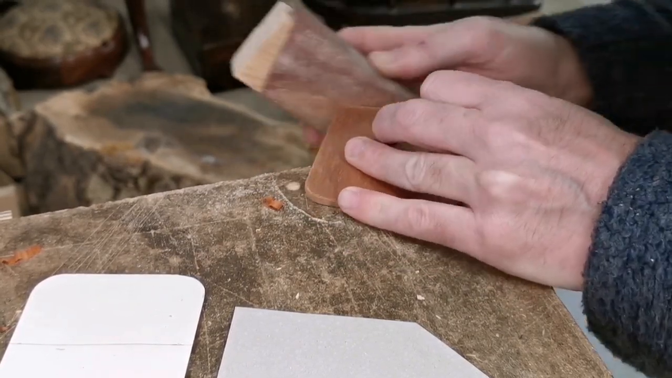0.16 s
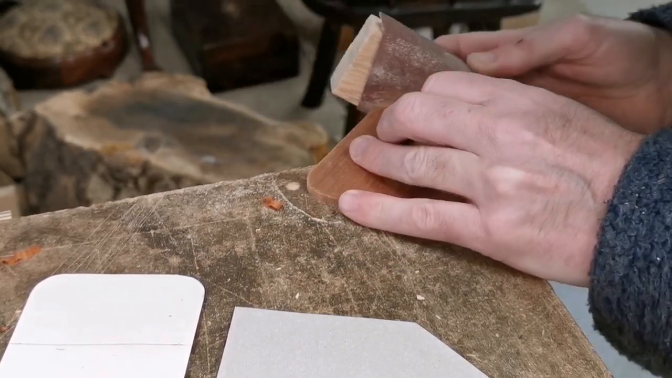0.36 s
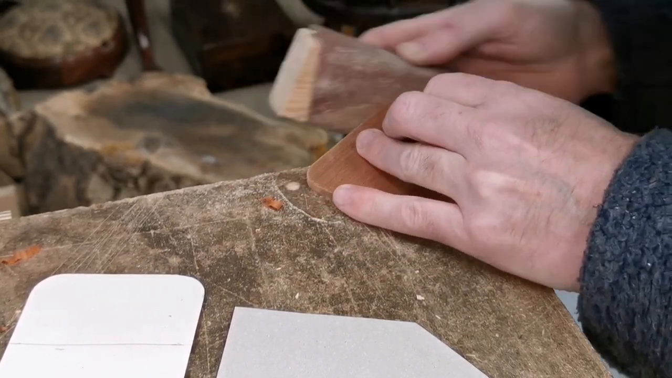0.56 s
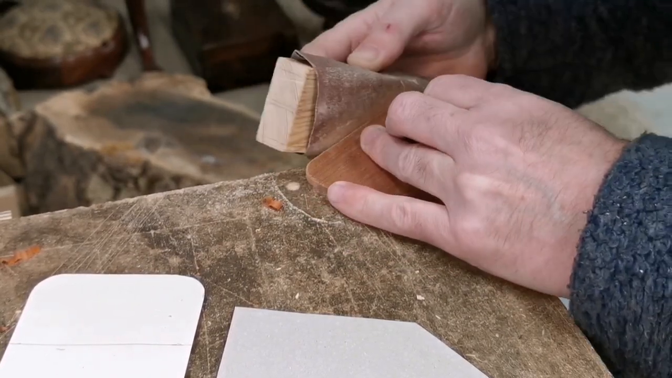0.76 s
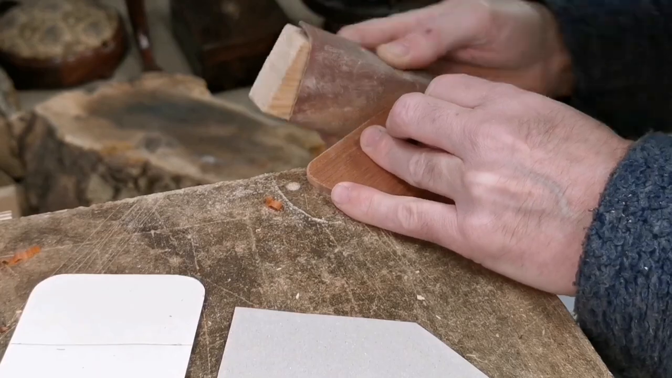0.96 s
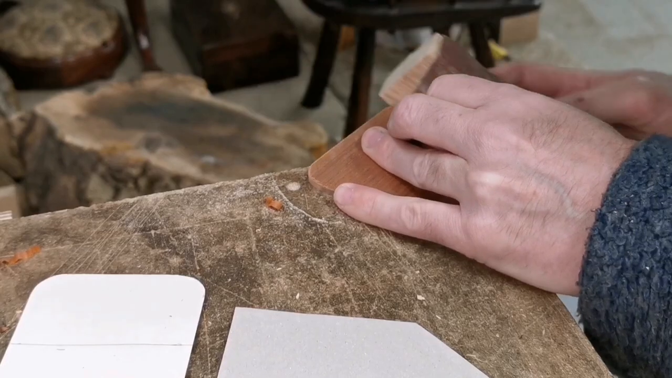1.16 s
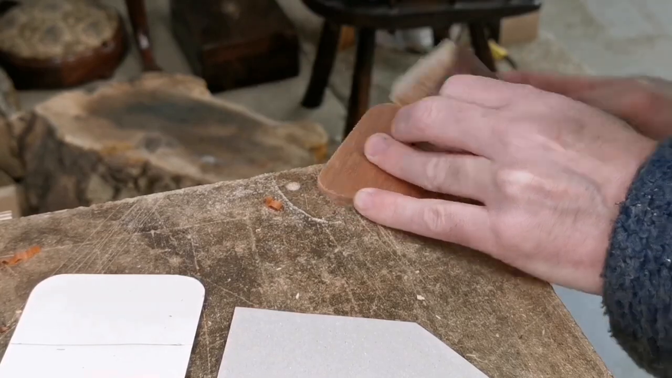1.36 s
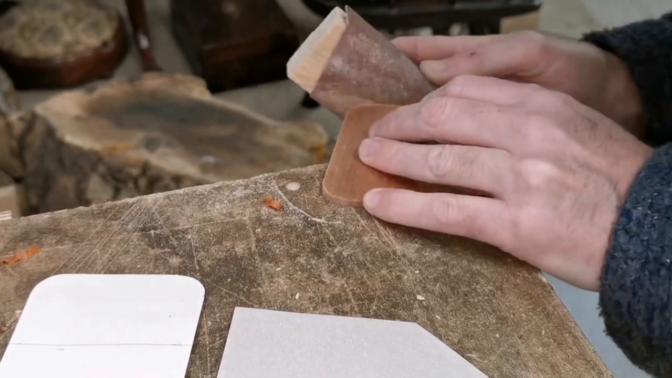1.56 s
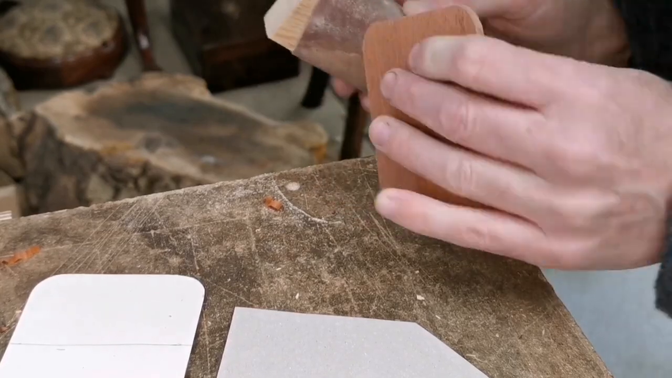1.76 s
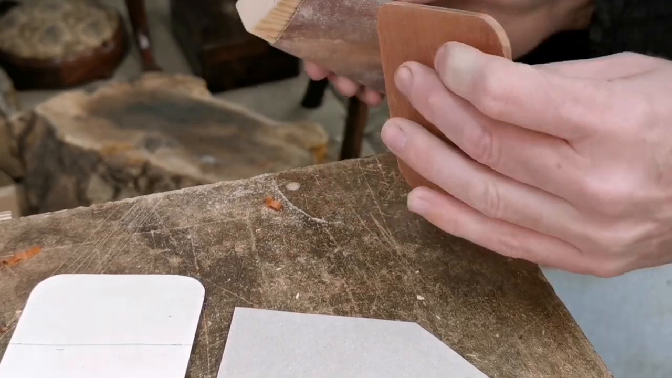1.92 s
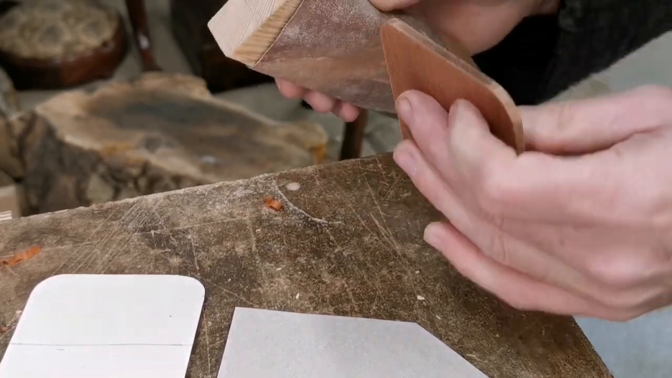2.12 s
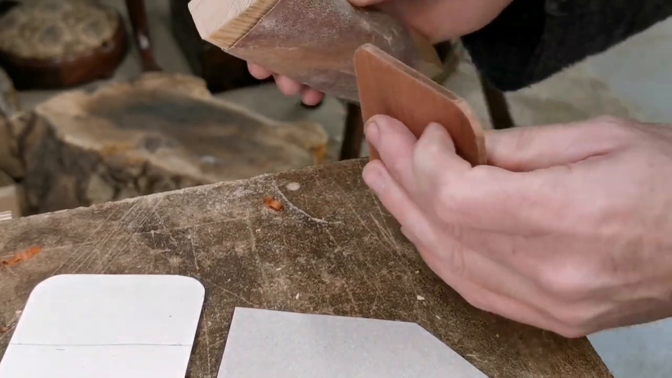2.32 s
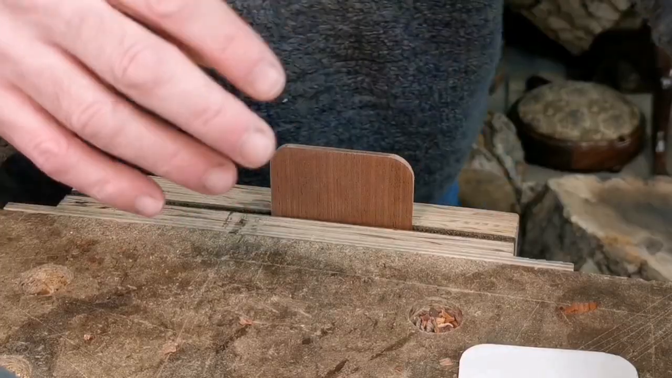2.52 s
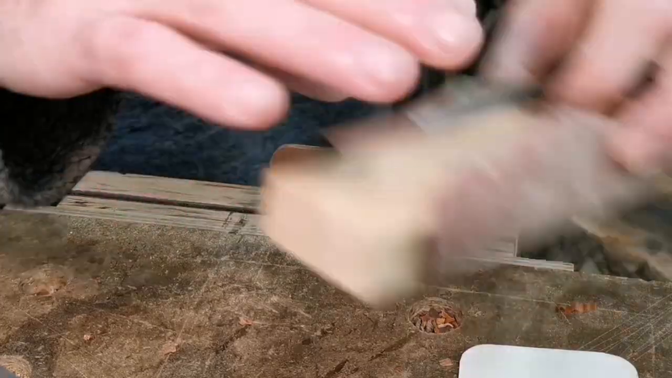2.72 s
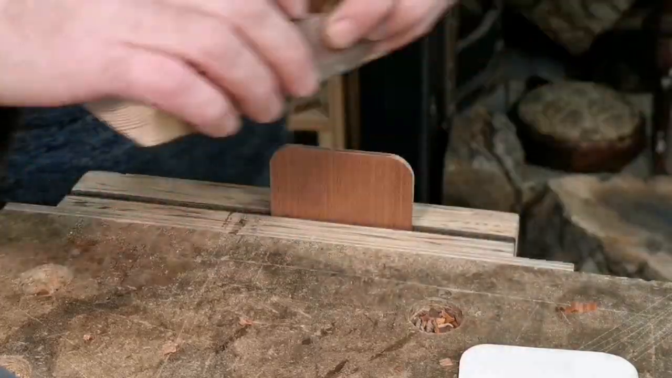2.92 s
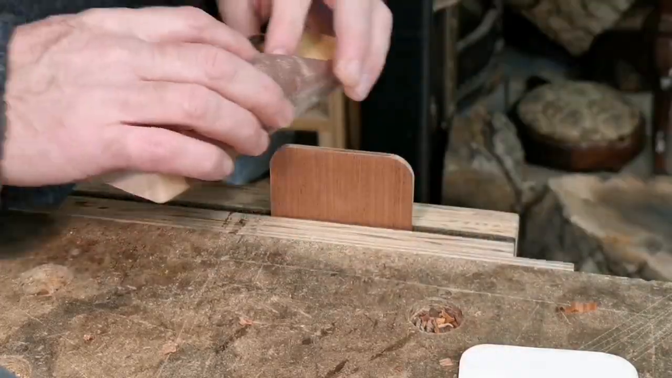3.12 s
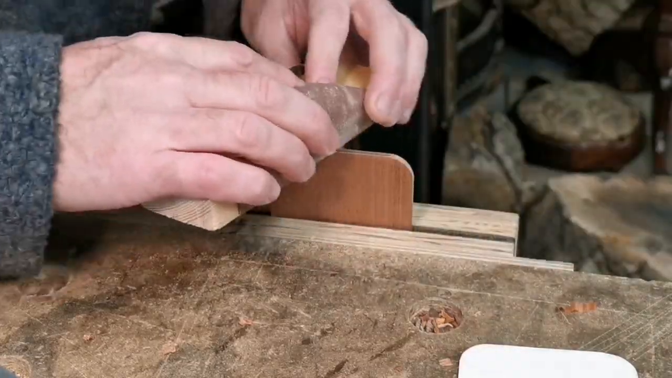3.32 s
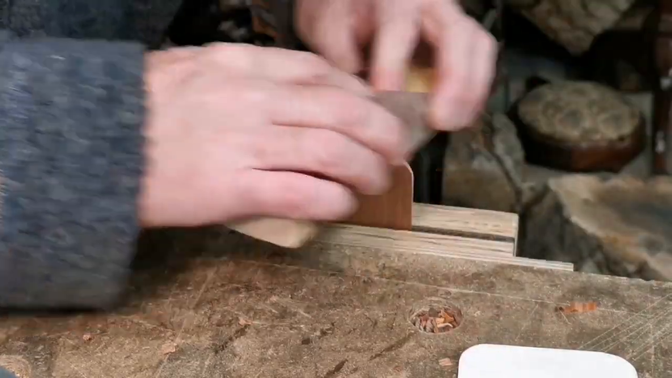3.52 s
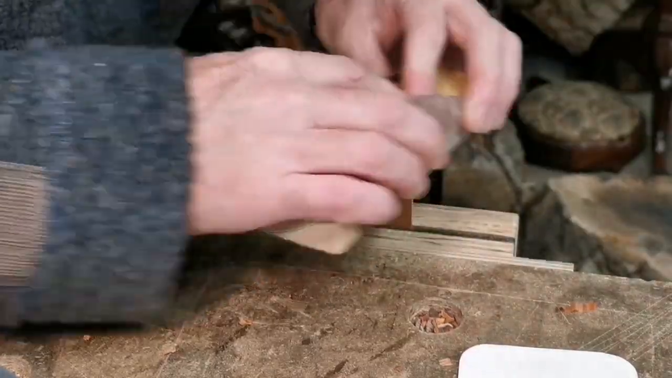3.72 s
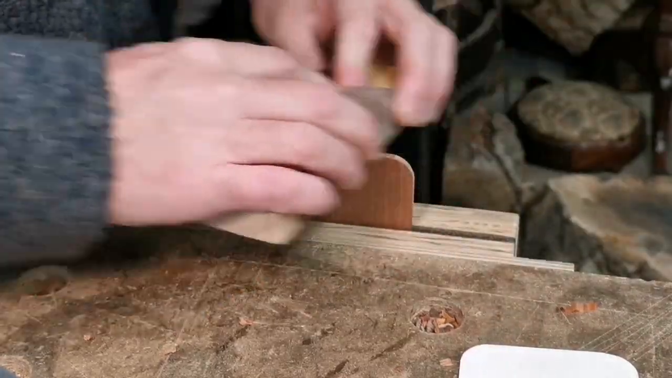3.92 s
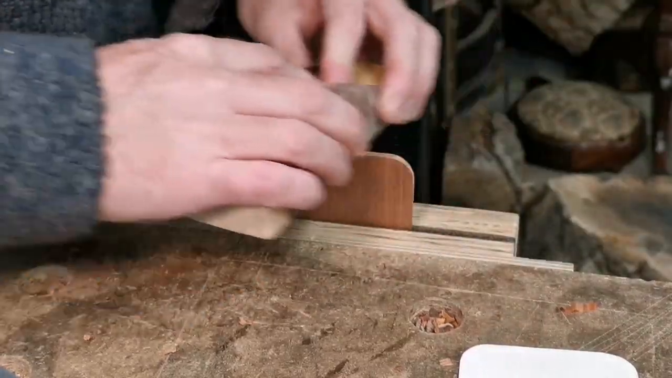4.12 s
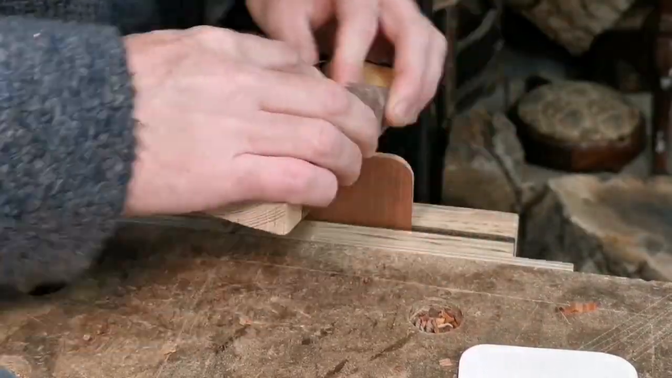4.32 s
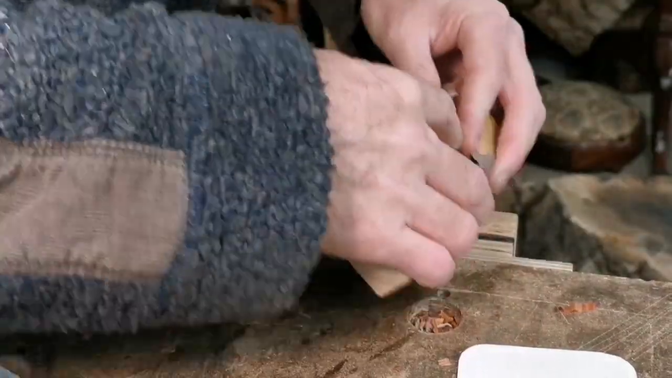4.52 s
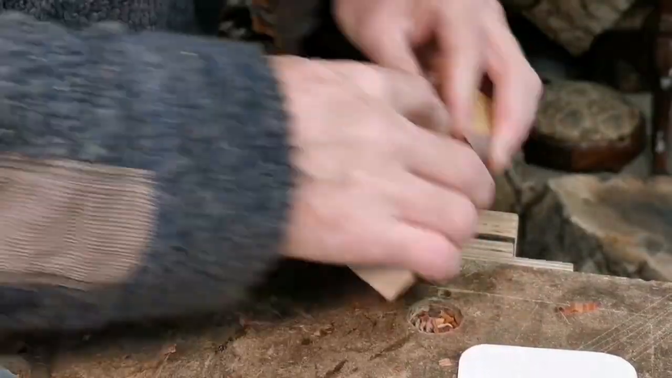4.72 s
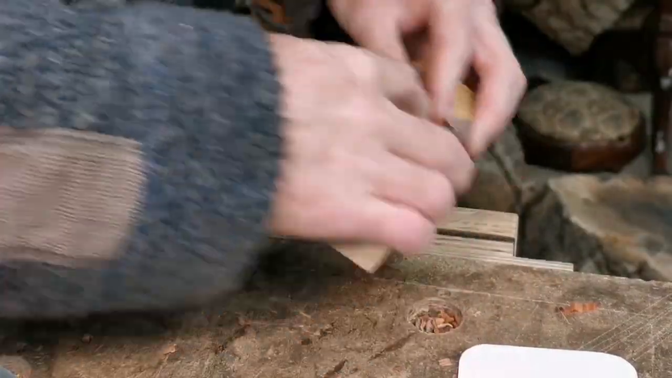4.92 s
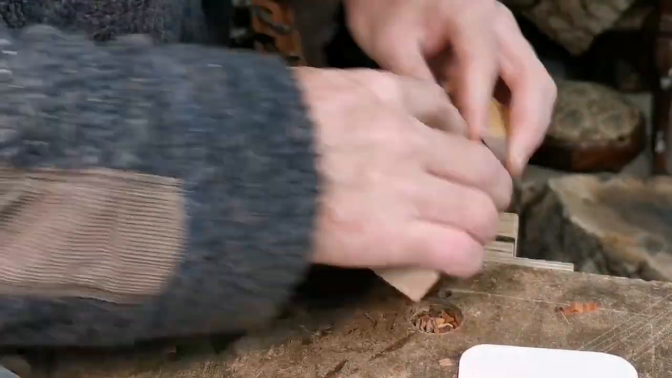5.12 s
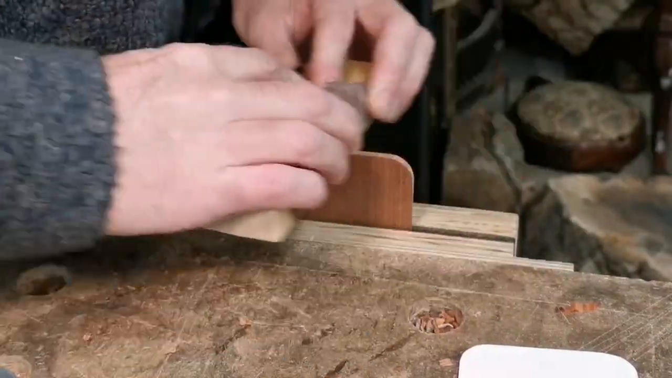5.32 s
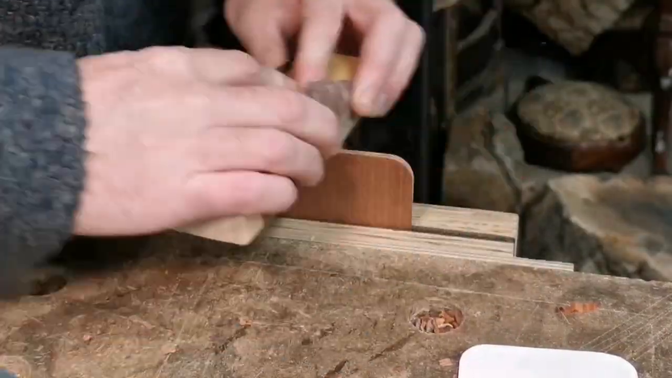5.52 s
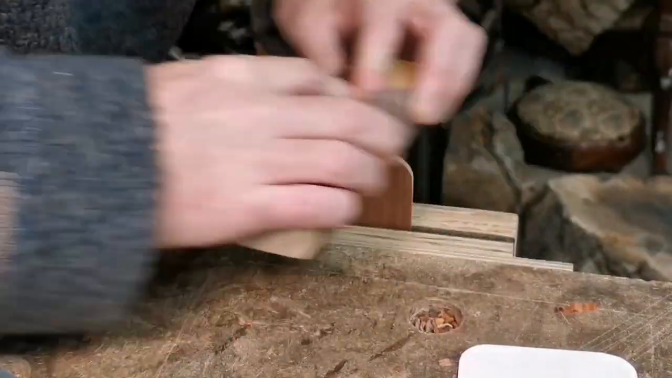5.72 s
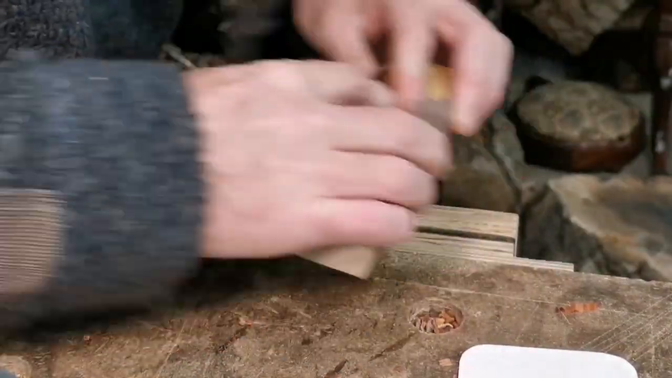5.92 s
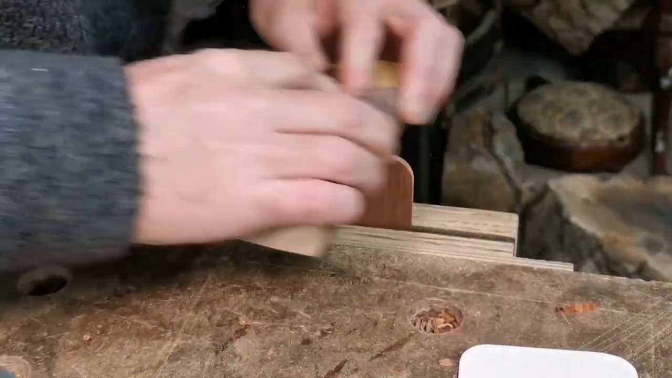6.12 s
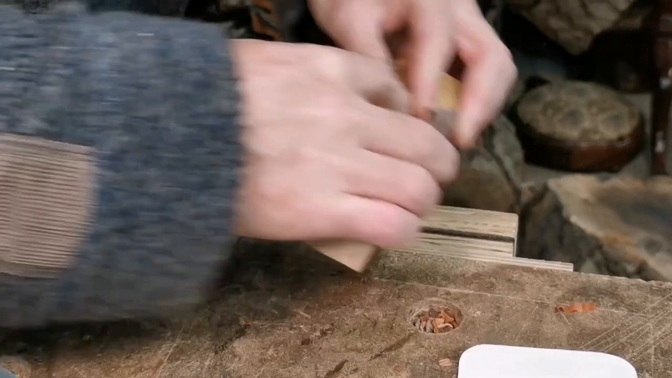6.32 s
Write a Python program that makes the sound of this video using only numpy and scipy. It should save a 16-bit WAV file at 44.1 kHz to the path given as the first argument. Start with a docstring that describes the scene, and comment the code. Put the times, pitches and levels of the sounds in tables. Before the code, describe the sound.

A quiet workshop heard very close, with faint air and low rumble. From 0 s, in stereo, sandpaper on a block gives slow, light gritty rubs on a hand-held wooden piece: one already ending at the start, a sharp knock at about 0.24 s, then scrapes near 0.4, 0.7 and 1.2 s, with soft low bench thuds. A short scuff with a papery squeak comes at 1.8 s, small dull knocks at 2.2 s, then near quiet. Sound drops to silence around 2.47-2.52 s. It returns in mono with crisp paper snaps at 2.55-2.6 s, rustling and short squeaks until 3.4 s, when the block knocks dully onto the clamped piece. From 3.56 s loud, quick back-and-forth sanding rasps, about eight strokes a second, hissy and woody, with hollow bench boom. Strokes slow and weaken around 4.5-5.1 s, then strengthen and continue to the abrupt end near 6.4 s.

```python
"""A quiet workshop, microphone close to a small wooden piece that sandpaper on a block rubs.
First, in stereo, slow strokes on the hand-held piece: grit clicks ring it and shake the bench top.
After a short silent gap, in mono, paper and block are handled and set on the piece, now clamped in the bench.
Quick strokes follow: random grit drives the piece, the bench boards and their boom through resonances.
The block knocks, the paper snaps and squeaks, and faint air with a wavering rumble lies below."""
import sys
import numpy as np
from scipy import signal
from scipy.io import wavfile
from scipy.ndimage import uniform_filter1d

SR = 44100
rng = np.random.default_rng(int(sys.argv[2]) if len(sys.argv) > 2 else 0)


def unload_wav(signal):
    """Save mono or channel-first audio to the path in sys.argv[1] as 16-bit WAV at rate SR, clipped to [-1, 1]."""
    wavfile.write(
        sys.argv[1],
        SR,
        np.round(np.clip(np.atleast_2d(signal).T, -1, 1) * 32767).astype(np.int16),
    )


def gain_from_decibels(decibels):
    """Convert decibel values to linear amplitude factors."""
    exponent = np.asarray(decibels, float) / 20
    return 10 ** exponent


N = 280917
SECOND_SETUP_S = 2.5
# All source levels stand ahead of the room tail and of the gain in record().
# resonances of the bench top: (centre [Hz], width [Hz], relative level [dB])
BENCH_TOP = [(310, 80, 0), (420, 80, -1), (495, 70, 0), (610, 120, -1), (760, 180, -6)]


def read(points, hz):
    """Value of a spectrum on a log-frequency axis."""
    f, value = np.transpose(points)
    return np.interp(np.log(hz + 1), np.log(f + 1), value)


def evened(x):
    """Scales to rms 1."""
    return x / np.sqrt(np.mean(x ** 2) + 1e-20)


def column(tables, order):
    """One dB column of joined tables as a gain for every sample."""
    rows = np.concatenate(tables)
    return gain_from_decibels(np.interp(np.arange(N) / SR, rows[:, 0], rows[:, order]))


def ringing(modes):
    """Steep resonance peaks added in power."""
    def gain(hz):
        return np.sqrt(sum(gain_from_decibels(2 * db) / (1 + (2 * (hz - f) / width) ** 2) ** 1.42
                           for f, width, db in modes))
    return gain


def hiss(points):
    """Gain of a broad spectrum."""
    return lambda hz: gain_from_decibels(read(points, hz))


def grit(per_s, spread_db, smooth):
    """Random grain catches of uneven size over a fine smooth scrape, two unrelated streams."""
    size = gain_from_decibels(spread_db * np.minimum(rng.exponential(1, (2, N)), 3))
    size = size * rng.choice([-1, 1], (2, N))
    clicks = evened(size * (rng.random((2, N)) < per_s / SR))
    share = np.clip(smooth, 0, 1)  # power share of the scrape
    return np.sqrt(1 - share) * clicks + np.sqrt(share) * rng.standard_normal((2, N))


def colour(drive, shape, patchy_db, wide, fine_db=0, size=1024):
    """Filters the drive; the contact wanders, so broad patches and narrow modes swell and fade. Mid has rms 1."""
    # stereo likeness: (frequency [Hz], left-right likeness [0 to 1])
    likeness = [(60, 0.83), (180, 0.88), (350, 0.89), (550, 0.52), (1650, 0.082), (4970, 0.52), (15000, 1)]
    # stereo lean: (frequency [Hz], left minus right [dB])
    side_lean = [(60, 1), (130, 3), (290, 1.5), (640, -2.5), (1410, -4.5), (3100, -4), (6820, -1.5),
                 (15000, -17.5)]
    hz, _, (a, b) = signal.stft(drive, SR, nperseg=size, noverlap=size * 3 // 4)
    broad, fine = rng.standard_normal((2, *a.shape))
    broad = evened(uniform_filter1d(uniform_filter1d(broad, 10, 0), 6, 1, mode="wrap"))
    fine = evened(uniform_filter1d(uniform_filter1d(fine, 2, 0), 20, 1, mode="wrap"))
    same = np.clip(read(likeness, hz), 0, 1)[:, None] if wide else 1
    lean = gain_from_decibels(read(side_lean, hz) / 2)[:, None] if wide else 1
    left = a * lean
    right = (same * a + np.sqrt(1 - same ** 2) * b) / lean
    wander = gain_from_decibels(patchy_db * broad + fine_db * fine)
    z = np.array([left, right]) * (shape(hz)[:, None] * wander)
    out = signal.istft(z, nperseg=size, noverlap=size * 3 // 4)[1][:, :N]
    return out / np.std(out.mean(0))


def arcs(table, order):
    """Rounded arcs from start over the fastest moment to the end, each dying away in a soft tail; powers add."""
    roundness = 1.036
    tail_db, tail_t60 = -15.5, 0.52  # each movement dies away in a soft tail; t60 [s]
    t = np.arange(N) / SR
    power = 0
    for row in table:
        place = np.interp(t, np.sort(row[:3]), [0, .5, 1])
        power = power + gain_from_decibels(2 * row[order]) * np.abs(np.sin(np.pi * place)) ** (2 * roundness)
    keep = gain_from_decibels(-120 / (tail_t60 * SR))  # of power, per sample
    tail = signal.lfilter([1 - keep], [1, -keep], power)
    return np.sqrt(power + gain_from_decibels(2 * tail_db) * tail)


def held_rub():
    """Grit drives the modes of the hand-held piece and a broad hiss, mostly in slow strokes."""
    # strokes, the ringing after the knock at 0.235 s, and a very faint rub from 1.9 s:
    # (start [s], fastest or loudest [s], end [s], piece ringing [dB], grit hiss [dB])
    held_arcs = [(-0.04, 0.04, 0.1, -38, -36), (0.1, 0.125, 0.16, -51.5, -53.5),
                 (0.235, 0.25, 0.32, -56, -70), (0.29, 0.4, 0.46, -48, -44),
                 (0.585, 0.69, 0.8, -46.5, -45.5), (1.0, 1.07, 1.12, -63, -60.5),
                 (1.06, 1.23, 1.358, -45, -41.5), (1.3, 1.38, 1.57, -60, -58.5),
                 (1.73, 1.825, 1.88, -60.5, -53), (1.9, 2.1, 3.2, -80.5, -77),
                 (2.17, 2.185, 2.24, -69.5, -67.5)]
    # resonances of the held piece: (centre [Hz], width [Hz], relative level [dB])
    piece_modes = [(1265, 50, -1.5), (1860, 1600, -3.5), (2186, 330, -0.5), (2760, 450, 0.5),
                   (3330, 130, -0.5), (3780, 490, -6)]
    # colour of the grit hiss: (frequency [Hz], relative level [dB])
    hiss_colour = [(2470, -67.5), (4200, -6), (5300, 1.5), (6300, 0), (6800, 5.5), (7600, -2.5), (8300, -8),
                   (9700, -8.5), (10600, -4), (11700, -9.5), (13300, -9.5), (14000, -30), (14400, -24.5),
                   (15900, -14)]
    rub = grit(per_s=2500, spread_db=6.0, smooth=0.69)
    ring = colour(rub, ringing(piece_modes), patchy_db=1.5, fine_db=2.0, wide=True)
    scrape = colour(rub, hiss(hiss_colour), patchy_db=2.5, fine_db=2.7, wide=True)
    return arcs(held_arcs, order=3) * ring + arcs(held_arcs, order=4) * scrape


def held_shake():
    """The held piece shakes the bench top, whose low modes, high modes and thud answer sparser grit."""
    # shakes: (start [s], end [s], low modes [dB], high modes [dB], thud [dB])
    bench_shakes = [(-0.05, 0.057, -42.5, -48.5, -62), (0.04, 0.203, -59, -58.5, -55.5),
                    (0.222, 0.272, -49, -63, -56), (0.272, 0.405, -50.5, -62, -57),
                    (0.392, 0.521, -59, -67, -52), (0.597, 0.72, -57.5, -61, -60),
                    (0.68, 0.821, -55, -56.5, -52), (1.1, 1.32, -52.5, -53.5, -63),
                    (1.229, 1.417, -53.5, -47.5, -42), (1.792, 1.883, -56.5, -58, -75),
                    (2.152, 2.246, -66, -60.5, -78), (2.212, 2.35, -60, -62, -60)]
    # resonances of the thud: (centre [Hz], width [Hz], relative level [dB])
    thud_modes = [(100, 10, -21), (147, 9.8, 10), (216, 19, -3)]
    peak_share = 0.55  # share of a shake that passes before its peak
    shake = grit(per_s=280, spread_db=4.5, smooth=0.59)
    moves = [(a, a + peak_share * (b - a), b, *dbs) for a, b, *dbs in bench_shakes]
    low = colour(shake, ringing(BENCH_TOP[:2]), patchy_db=2.5, fine_db=2.0, wide=True, size=2048)
    high = colour(shake, ringing(BENCH_TOP[2:]), patchy_db=4.0, fine_db=3.5, wide=True, size=2048)
    thud = colour(shake, ringing(thud_modes), patchy_db=4.5, wide=True, size=4096)
    return arcs(moves, order=3) * low + arcs(moves, order=4) * high + arcs(moves, order=5) * thud


def air(wide):
    """The quiet workshop: a faint broad tone and a deep rumble that wavers."""
    # colour of the room tone: (frequency [Hz], relative level [dB])
    tone_colour = [(15, -34), (25, 0), (68, -14.5), (130, -12.5), (307, -16), (527, -28), (3880, -39),
                   (4820, -33.5), (9460, -47.5), (13400, -43), (15800, -54)]
    # deepest air, one list for each set-up: (time [s], level [dB])
    deep_level = [
        [(0.0, -78), (0.45, -69), (1.3, -60), (1.65, -69), (2.43, -68.5)],
        [(2.54, -55), (3.6, -54), (4.5, -57.5), (5.7, -71), (6.37, -51)],
    ]
    tone = colour(rng.standard_normal((2, N)), hiss(tone_colour), patchy_db=3.5, wide=wide, size=2048)
    deep = colour(rng.standard_normal((2, N)), ringing([(44.7, 19, 0)]), patchy_db=1.5, wide=wide, size=4096)
    return gain_from_decibels(-66) * tone + column(deep_level, order=1) * deep


def room(x, db, t60):
    """Walls and clutter add a short diffuse tail, 4 ms behind the direct sound."""
    t = np.arange(SR // 2) / SR
    tail = rng.standard_normal(len(t)) * gain_from_decibels(-60 * t / t60) * (t > .004)
    tail = tail / np.linalg.norm(tail)
    return x + gain_from_decibels(db) * signal.fftconvolve(x, tail[None], axes=1)[:, :N]


def knocks():
    """Each blow rings the same modes, most of all near the pitch its contact time favours, with a dry crack."""
    # knocks of the block and snaps of the paper: (time [s], peak [dB], favoured pitch [Hz]: hard contact = high)
    blows = [(.2305, -38, 1500), (.2356, -22, 3200), (.2372, -26, 2300), (2.172, -46, 620),
             (2.241, -33, 300), (2.556, -39, 7000), (2.576, -35, 6600), (2.583, -38, 8000),
             (2.591, -33, 4000), (2.618, -37, 6000), (.352, -33, 450), (3.42, -32, 560), (3.429, -28, 400),
             (3.436, -32, 560)]
    # modes that a blow rings: (nominal pitch [Hz], relative level [dB], t60 [s])
    blow_modes = [(270, 0, .035), (390, -1, .03), (570, -2, .05), (760, -5, .03), (1300, -5, .012),
                  (1800, -3, .007), (2300, 0, .007), (3000, -4, .005), (4500, -3, .005), (6600, 0, .005),
                  (10500, -2, .004)]
    crack_share, crack_t60, hard_hz = .6, .007, 3000  # contacts below hard_hz crack less
    out, t = np.zeros(N), np.arange(4000) / SR
    for s, peak_db, favoured in blows:
        ring = np.zeros(len(t))
        for hz, db, t60 in blow_modes:
            pitch = hz * (1 + .04 * rng.uniform(-1, 1))
            level_db = db - 60 * t / t60 - 5 * np.log2(hz / favoured) ** 2
            ring += gain_from_decibels(level_db) * np.sin(2 * np.pi * pitch * t)
        band = signal.butter(2, [favoured / 2, min(favoured * 2, 15000)], "bandpass", fs=SR)
        crack = signal.lfilter(*band, rng.standard_normal(len(t))) * gain_from_decibels(-60 * t / crack_t60)
        hardness = min(favoured / hard_hz, 1) ** 2
        blow = ring / np.abs(ring).max() + crack_share * hardness * crack / np.abs(crack).max()
        blow *= 1 - np.exp(-2.5 * favoured * t)  # harder contacts rise faster
        at = round(s * SR)
        out[at:at + len(t)] -= gain_from_decibels(peak_db) * blow / np.abs(blow).max()
    return out


def squeaks():
    """Short squeaks of the paper, each a rough push on one mode, and at 2.15 s a faint band of hiss."""
    # squeaks and the hiss: (time [s], length [s], pitch [Hz], peak [dB], t60 [s]: very short = a band of hiss)
    pushes = [(1.785, .075, 2700, -52, .22), (1.785, .07, 4250, -45, .012), (1.82, .04, 1300, -54, .05),
              (2.15, .27, 5000, -60, .003), (2.715, .02, 2230, -46, .025), (2.75, .025, 2200, -37, .03),
              (3.005, .03, 1700, -40, .015), (3.08, .05, 1900, -42, .02), (3.255, .03, 2950, -36, .025),
              (3.405, .02, 1300, -39, .02), (3.515, .025, 1650, -44, .02)]
    out, t = np.zeros(N), np.arange(12000) / SR
    for s, length, hz, db, t60 in pushes:
        push = rng.standard_normal(len(t)) * np.sin(np.pi * np.clip(t / length, 0, 1))
        mode = gain_from_decibels(-60 * t / t60) * np.sin(2 * np.pi * hz * t)
        ring = signal.fftconvolve(push, mode)[:len(t)]
        at = round(s * SR)
        out[at:at + len(t)] += gain_from_decibels(db) * ring / np.abs(ring).max()
    return out


def stroke_levels():
    """Each quick stroke speeds up from its turn and slows to the next along a rounded arc."""
    # strokes: (turn [s], level at the turn [dB], fastest [s], level at full speed [dB],
    # low piece modes over high [dB]); an arc tops out a little short of full speed
    quick_strokes = [(3.561, -65, 3.627, -27.5, -3), (3.695, -51, 3.755, -26, -7),
                     (3.811, -48, 3.874, -27.5, -9), (3.94, -47, 3.975, -26, -4.5),
                     (4.054, -42.5, 4.13, -27, -8.5), (4.176, -47, 4.24, -26.5, -10),
                     (4.286, -49, 4.343, -28, -9), (4.425, -56, 4.495, -32.5, 0),
                     (4.547, -49, 4.611, -30.5, -5.5), (4.725, -66, 4.793, -36.5, -7),
                     (4.869, -55, 4.91, -34, -2), (5.03, -56.5, 5.144, -34.5, -3),
                     (5.204, -53, 5.269, -30, -6.5), (5.354, -53.5, 5.449, -28.5, -7),
                     (5.512, -47.5, 5.569, -27.5, -6), (5.644, -55.5, 5.706, -27, -6.5),
                     (5.763, -50.5, 5.829, -28, -1), (5.903, -52, 5.94, -28.5, -7.5),
                     (6.021, -42.5, 6.09, -27, -5), (6.156, -58.5, 6.222, -27.5, -1.5),
                     (6.272, -49, 6.31, -28.5, -6.5)]
    turn, turn_db, fastest, db, low_db = np.transpose(quick_strokes)
    t, count = np.arange(N) / SR, len(turn)
    knots = np.append(np.transpose([turn, fastest]).ravel(), 6.42)
    place = np.interp(t, knots, np.arange(2 * count + 1) / 2)
    k = np.minimum(place.astype(int), count - 1)
    # the block rests a moment at each turn
    speed = np.clip(1.11 * np.abs(np.sin(np.pi * place)) - .25, 0, 1) ** 0.95
    rest = gain_from_decibels(np.interp(t, turn, turn_db))
    level = rest + (gain_from_decibels(db[k]) - rest) * speed
    # hiss over high modes: 1.14 dB in a firm (-27 dB) stroke, less in weaker ones
    hiss_db = np.interp(t, fastest, 1.14 + 0.17 * (db + 27))
    return t > turn[0], level, hiss_db, np.interp(t, fastest, low_db)


def clamped_rub():
    """Handling, then quick strokes: grit drives low and high modes of the clamped piece and a hiss."""
    # paper and block handled, then set on the piece, levels ahead of the shares and unevenness below:
    # (start [s], fastest [s], end [s], piece ringing [dB], grit hiss [dB])
    handling = [(2.5, 2.6, 2.66, -46, -52.5), (2.61, 2.68, 2.777, -43.5, -45),
                (2.74, 2.76, 2.795, -50.5, -49), (2.8, 2.815, 2.88, -58, -63), (2.84, 2.91, 3.01, -57, -65),
                (2.995, 3.01, 3.06, -48, -49.5), (3.055, 3.09, 3.3, -48, -50),
                (3.2, 3.27, 3.41, -45.5, -45.5), (3.385, 3.4, 3.455, -39.5, -43.5),
                (3.45, 3.53, 3.56, -41.5, -47)]
    # resonances of the clamped piece: (centre [Hz], width [Hz], relative level [dB])
    piece_modes = [(1006, 124, -1), (1314, 450, -3.5), (1700, 460, -1.5), (2110, 150, -12),
                   (2227, 345, 2.5), (2780, 180, -3), (3090, 370, -1), (3270, 1200, -8.5)]
    # colour of the grit hiss: (frequency [Hz], relative level [dB])
    hiss_colour = [(2470, -25), (4200, -5), (5800, -1.5), (6800, 1.5), (7500, -7.5), (8500, -9.5),
                   (10000, -5), (10700, -2), (11600, -7), (13300, -8), (14000, -26), (14400, -15),
                   (15100, -8), (15900, -29)]
    rub = grit(per_s=3000, spread_db=2.6, smooth=0.77)[:1].repeat(2, 0)
    sanding, level, hiss_db, low_db = stroke_levels()
    # the three parts share the stroke's power
    high = sanding * level / np.sqrt(1 + gain_from_decibels(2 * hiss_db) + gain_from_decibels(2 * low_db))
    # handling catches and slips: 2 dB rms, smoothed over 13 ms
    wobble = uniform_filter1d(rng.standard_normal(N), round(0.013 * SR))
    uneven = gain_from_decibels(2 * evened(uniform_filter1d(wobble, 100)))
    handled = uneven * arcs(handling, order=3)
    handled_hiss = uneven * arcs(handling, order=4)
    low_ring = colour(rub, ringing(piece_modes[:3]), patchy_db=4.0, fine_db=1.2, wide=False)
    high_ring = colour(rub, ringing(piece_modes[3:]), patchy_db=2.5, fine_db=4.0, wide=False)
    scrape = colour(rub, hiss(hiss_colour), patchy_db=2.8, fine_db=3.5, wide=False)
    return ((high * gain_from_decibels(low_db) + 0.4 * handled) * low_ring
            + (high + 0.64 * handled) * high_ring
            + (high * gain_from_decibels(hiss_db) + handled_hiss) * scrape)


def clamped_bench():
    """The bench under the clamp takes the shaking: boards and boom partly follow the strokes, a rumble does not."""
    # boards, ahead of the stroke swell: (time [s], level [dB])
    boards_level = [(2.53, -69), (2.65, -55.5), (2.95, -67.5), (3.1, -60.5), (3.38, -66), (3.43, -38.5),
                    (3.48, -45.5), (4.3, -46.5), (4.66, -41.5), (4.72, -51), (4.95, -42.5), (5.02, -53),
                    (5.07, -44), (5.6, -47), (6.2, -46.5), (6.37, -50.5)]
    # boom, ahead of the stroke dips, and rumble: (time [s], boom level [dB], rumble level [dB])
    boom_level = [(2.53, -67, -58.5), (2.66, -75, -61), (2.81, -55.5, -68), (3.21, -84, -66),
                  (3.42, -51, -70), (3.62, -58, -48), (3.65, -44.5, -69), (3.76, -50, -49.5),
                  (4.3, -56.5, -53.5), (4.53, -45.5, -68), (4.61, -37.5, -51), (4.83, -50, -57),
                  (5.11, -42, -55), (5.19, -50, -76), (5.24, -47, -53), (5.27, -32.5, -76),
                  (5.47, -44, -49), (5.88, -58, -60.5), (5.93, -39.5, -50), (5.99, -55, -64),
                  (6.1, -50.5, -51), (6.37, -45, -60)]
    # resonances, all (centre [Hz], width [Hz], relative level [dB]): boards under the strokes, boom, rumble
    board_modes = [(362, 58, -6), (478, 14.5, 2), (639, 66, 3), (811, 18, 7)]
    boom_modes = [(170.6, 31, -6), (206.4, 17, -0.5)]
    rumble_modes = [(86, 20, -36), (109, 38, -7)]
    shake = grit(per_s=200, spread_db=6.0, smooth=0.63)
    sanding, level, _, _ = stroke_levels()
    strength = level / np.median(level[sanding])
    boards = column([boards_level], order=1)
    boom_gain = column([boom_level], order=1) * np.where(sanding, np.minimum(strength, 1) ** 0.29, 1)
    top = colour(shake, ringing(BENCH_TOP), patchy_db=3.5, wide=False)
    planks = colour(shake, ringing(board_modes), patchy_db=3.0, wide=False, size=2048)
    boom = colour(shake, ringing(boom_modes), patchy_db=1.0, wide=False, size=4096)
    rumble = colour(shake, ringing(rumble_modes), patchy_db=3.27, wide=False, size=4096)
    return (boards * ~sanding * top
            + boards * sanding * strength ** 0.29 * planks
            + boom_gain * boom
            + column([boom_level], order=2) * rumble)


def scene():
    """The two set-ups, one after the other, close to the microphone in the same room."""
    first = np.arange(N) < SECOND_SETUP_S * SR
    held = held_rub() + held_shake()
    clamped = clamped_rub() + clamped_bench()
    work = np.where(first, held, clamped) + knocks() + squeaks()
    return room(work, db=-10.5, t60=0.25) + np.where(first, air(wide=True), air(wide=False))


def low_pass(x):
    """Removes everything above the highest recorded frequency."""
    return signal.sosfilt(signal.butter(12, 17050, fs=SR, output="sos"), x)


def record(dry):
    """Sets each set-up's gain, with a quick fade out, a silent gap and a quick fade in, then limits the band."""
    # gain, held before the first and after the last row: (time [s], level [dB])
    gain_points = [(2.435, 5), (2.445, -5), (2.47, -48), (2.475, -120), (2.519, -120), (2.522, -28),
                   (2.529, -3)]
    edge = signal.firwin(301, 15850, window=("kaiser", 9), fs=SR)  # low-pass [Hz]
    faded = dry * column([gain_points], order=1)
    mix = signal.oaconvolve(faded, edge[None], "same")
    return low_pass(mix)


dry = scene()
out = record(dry)
unload_wav(out)
```